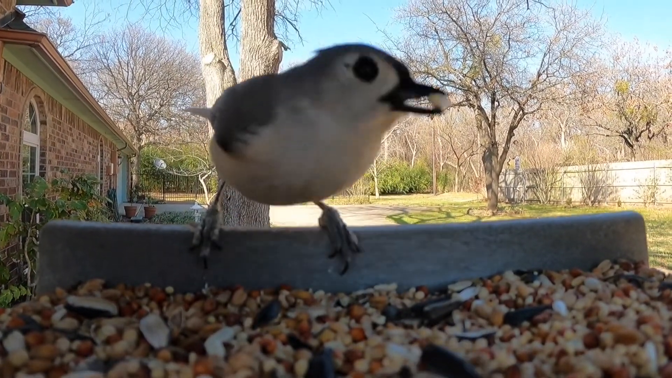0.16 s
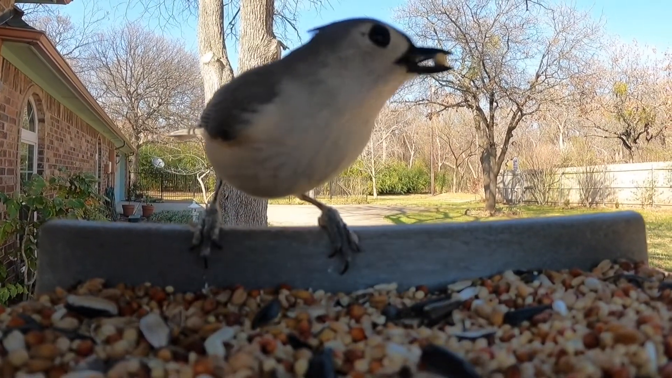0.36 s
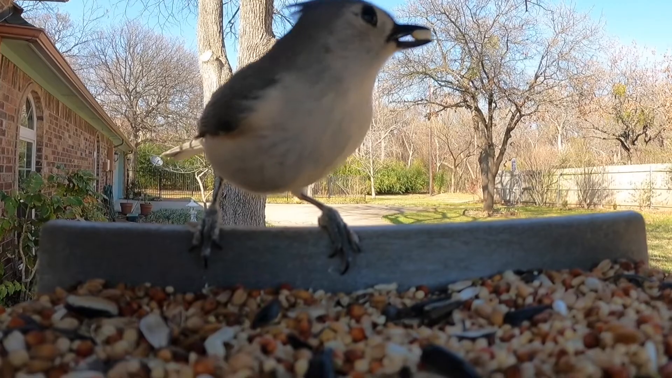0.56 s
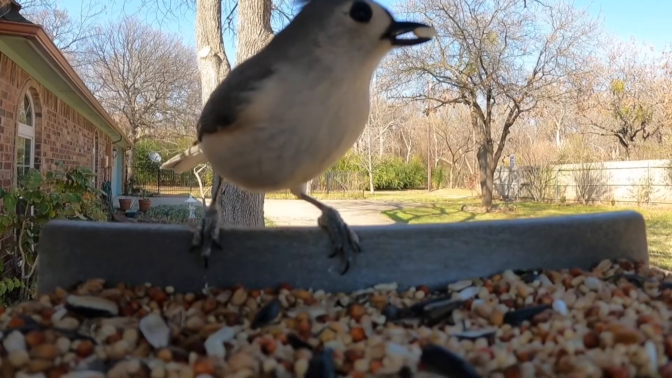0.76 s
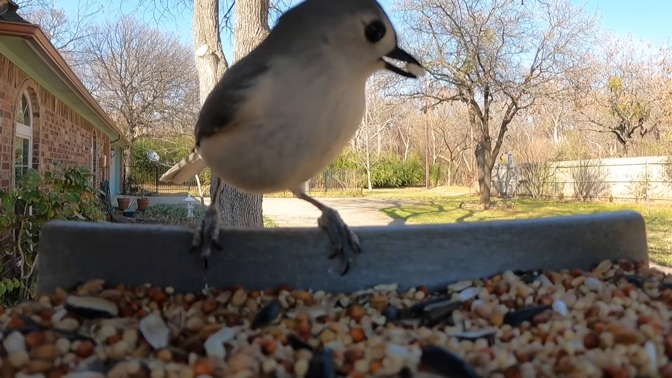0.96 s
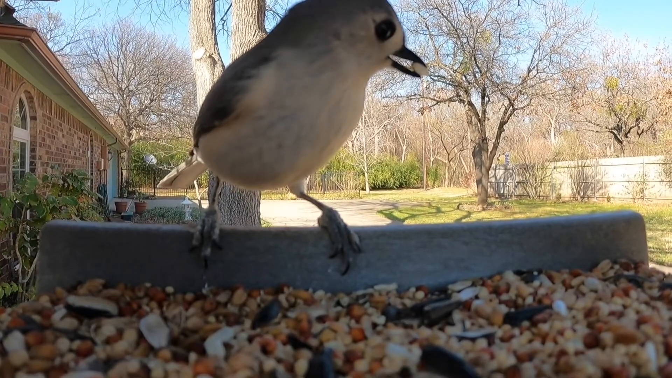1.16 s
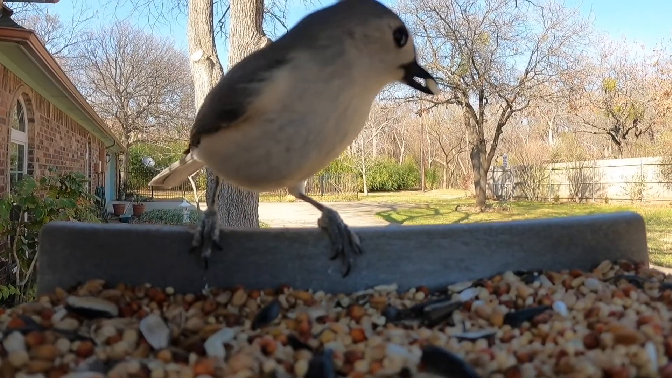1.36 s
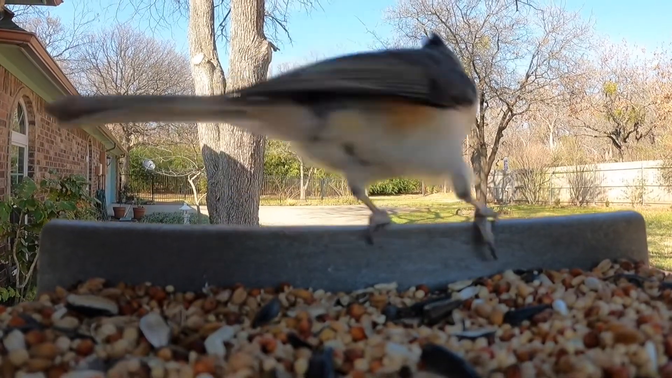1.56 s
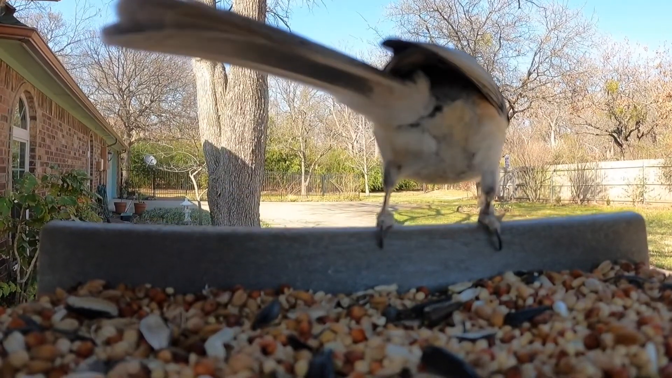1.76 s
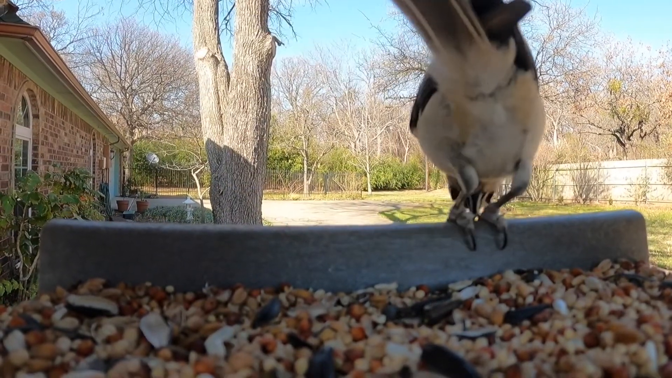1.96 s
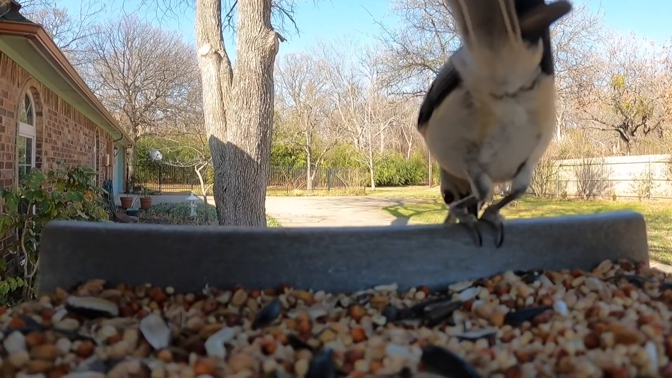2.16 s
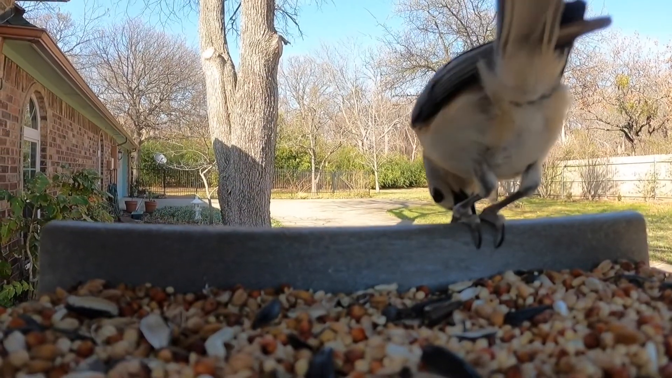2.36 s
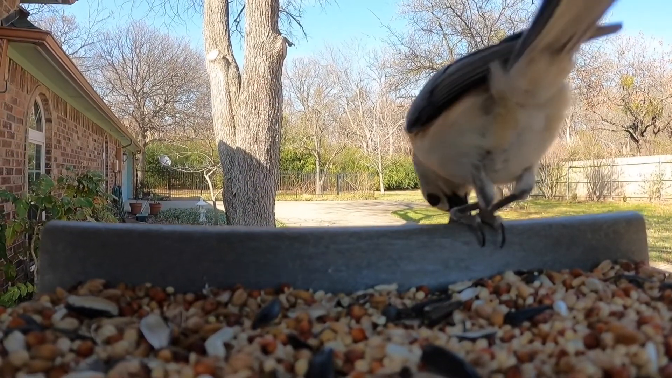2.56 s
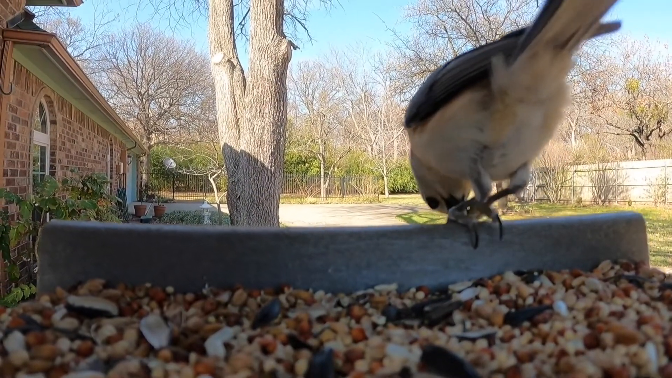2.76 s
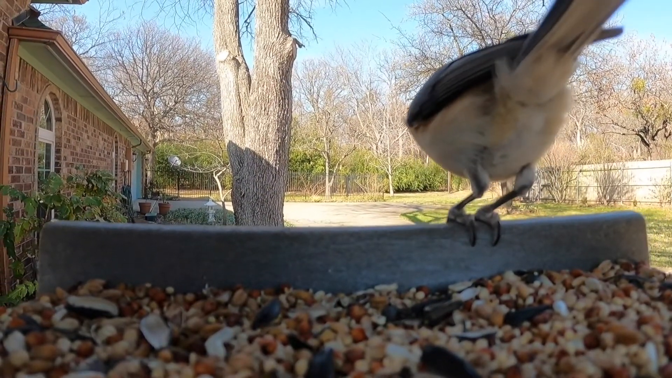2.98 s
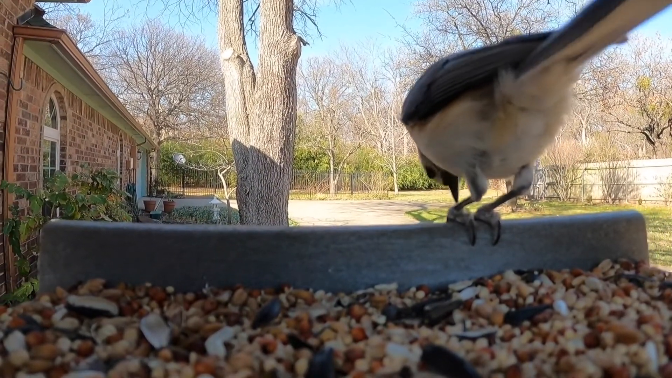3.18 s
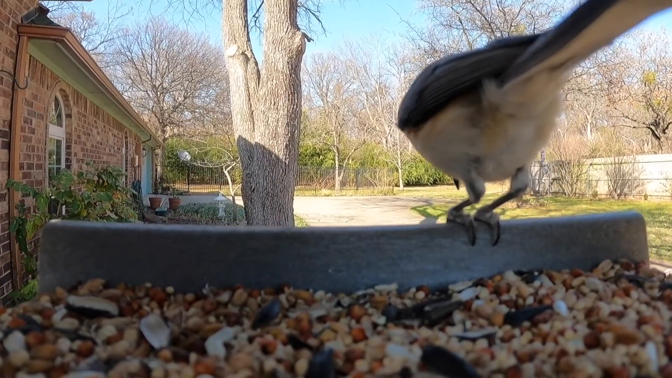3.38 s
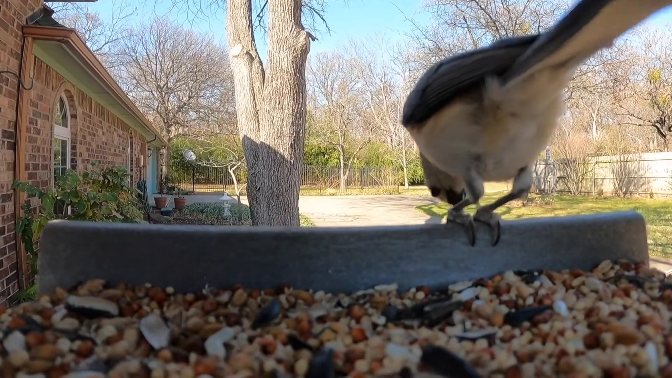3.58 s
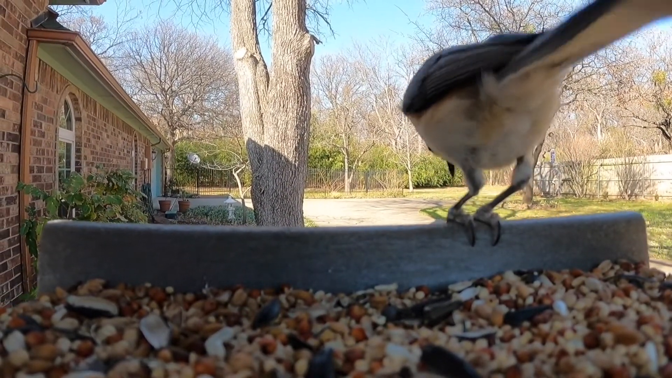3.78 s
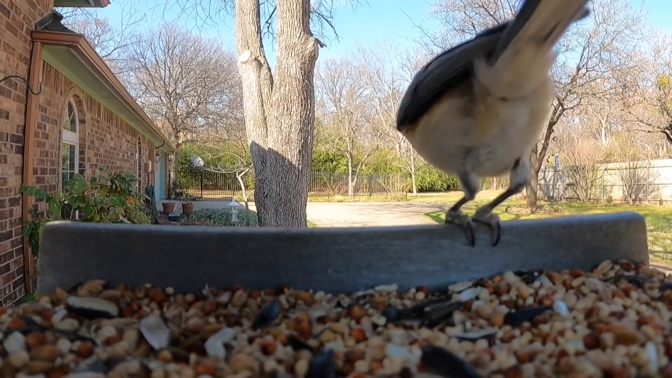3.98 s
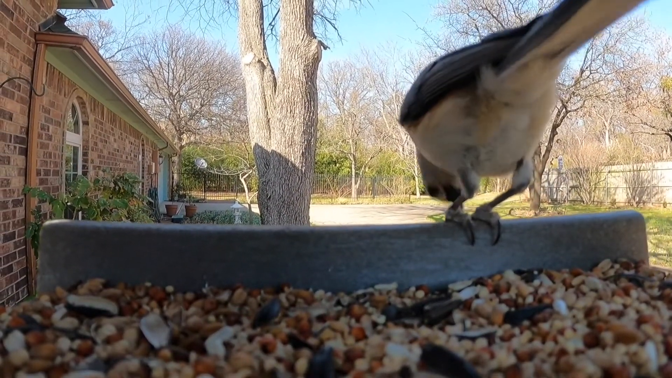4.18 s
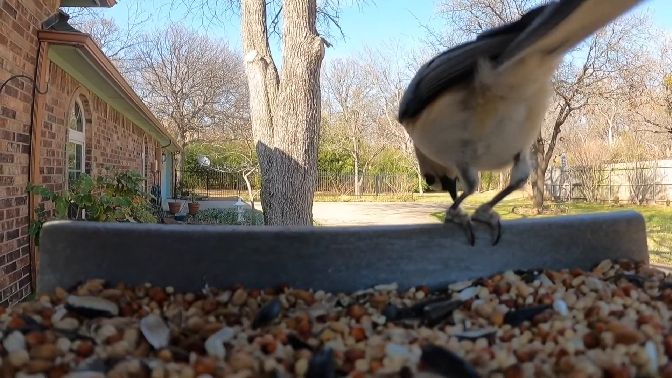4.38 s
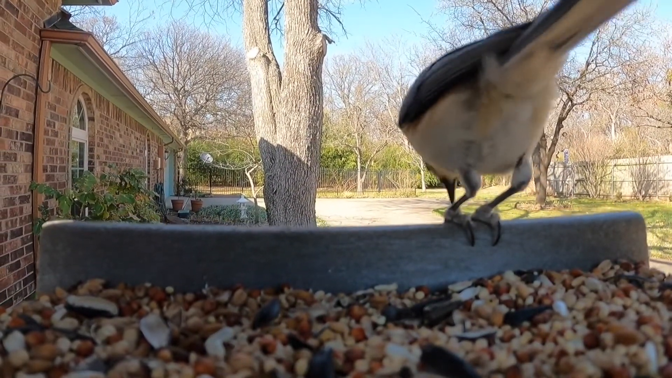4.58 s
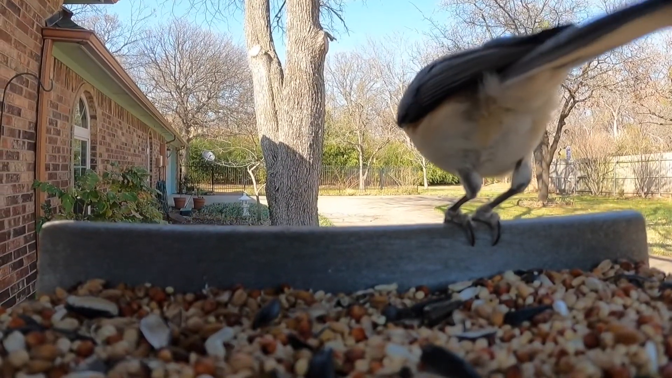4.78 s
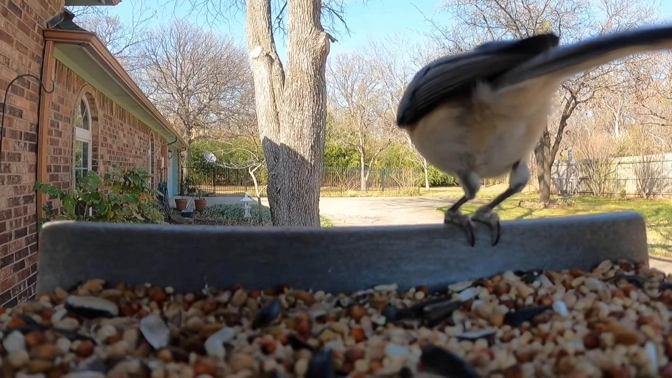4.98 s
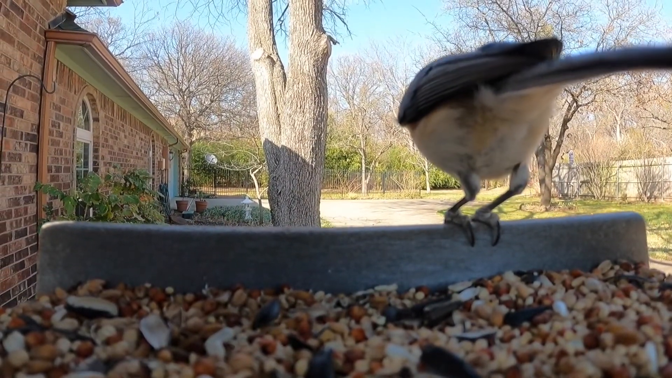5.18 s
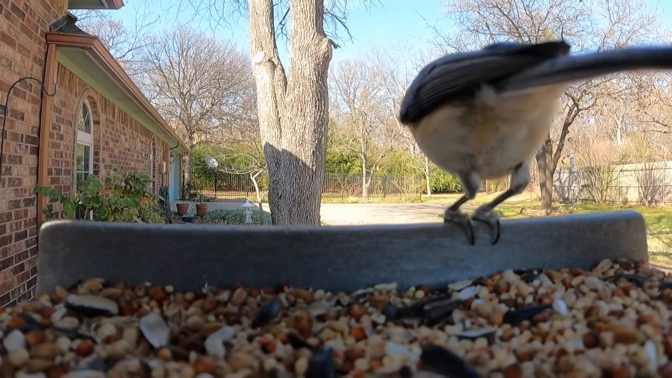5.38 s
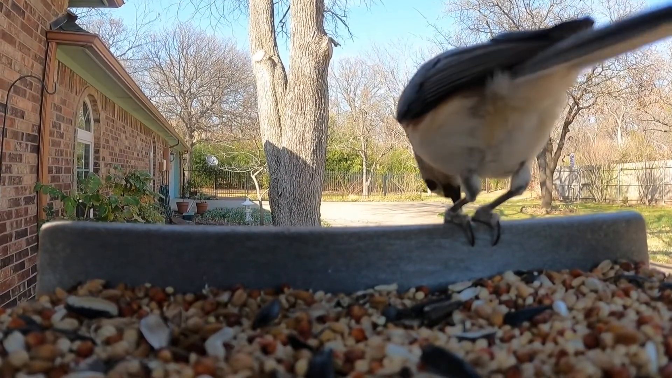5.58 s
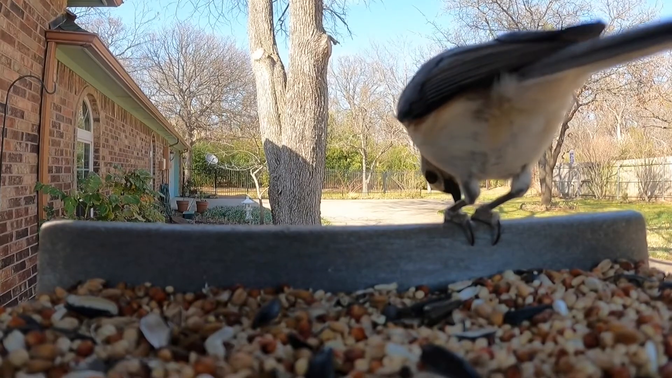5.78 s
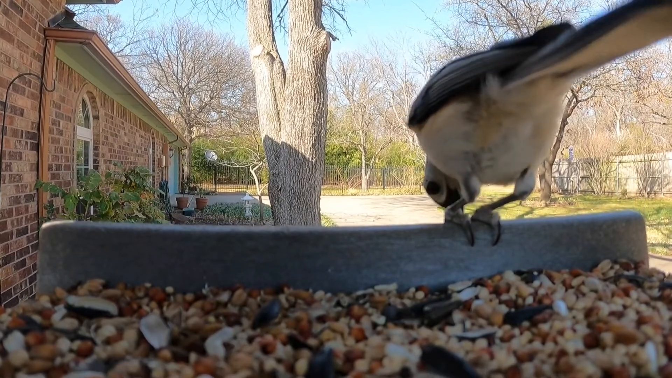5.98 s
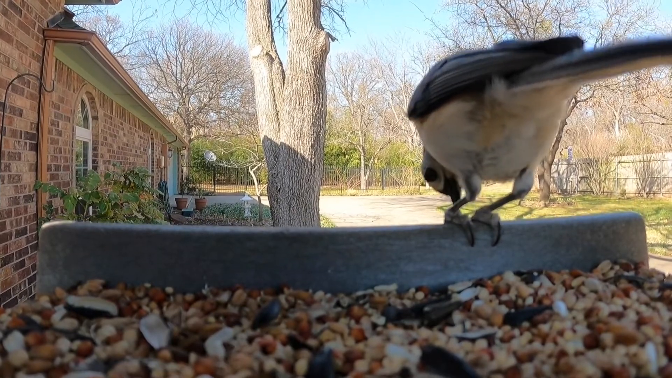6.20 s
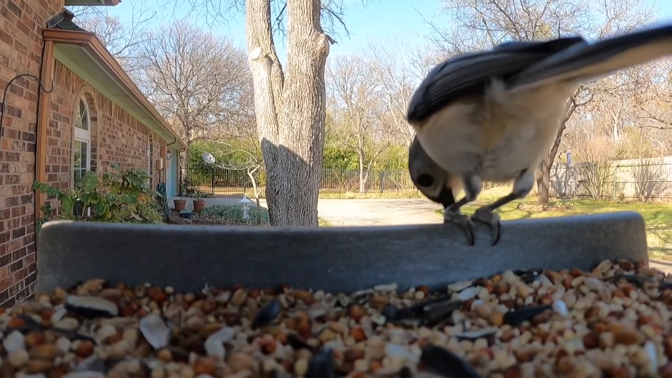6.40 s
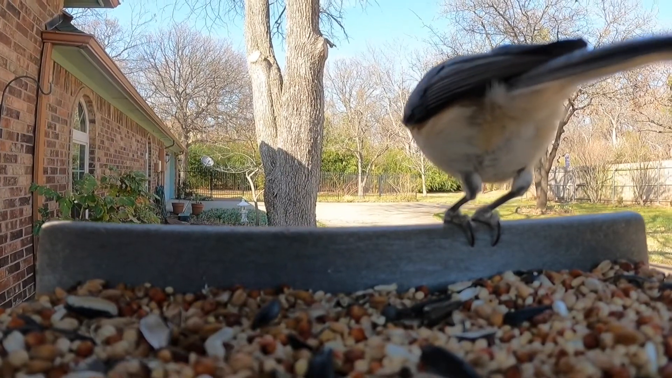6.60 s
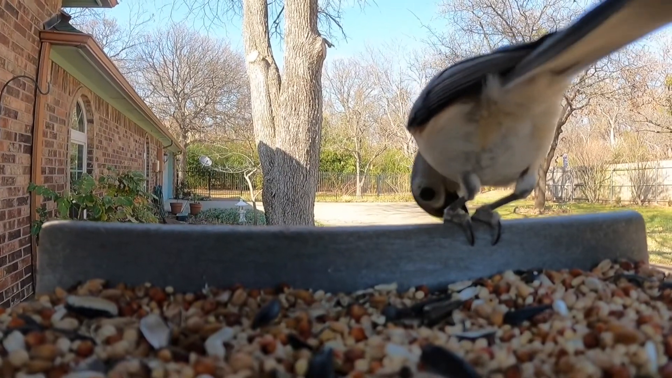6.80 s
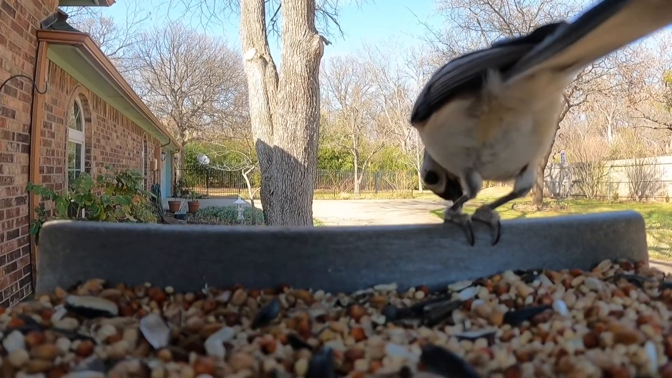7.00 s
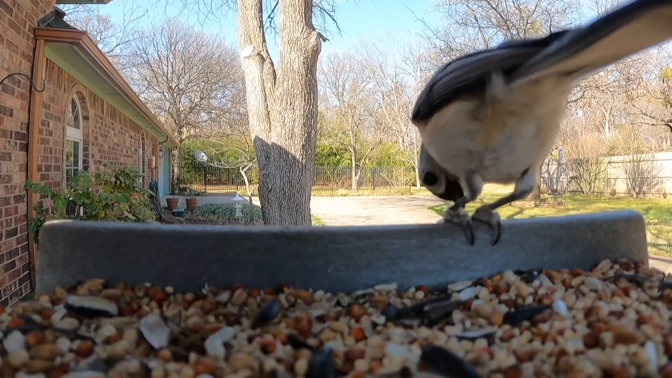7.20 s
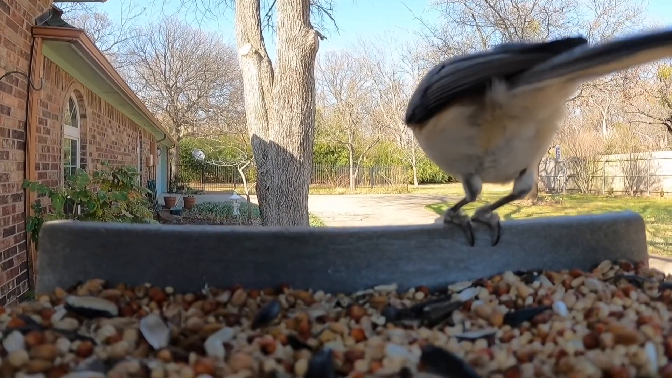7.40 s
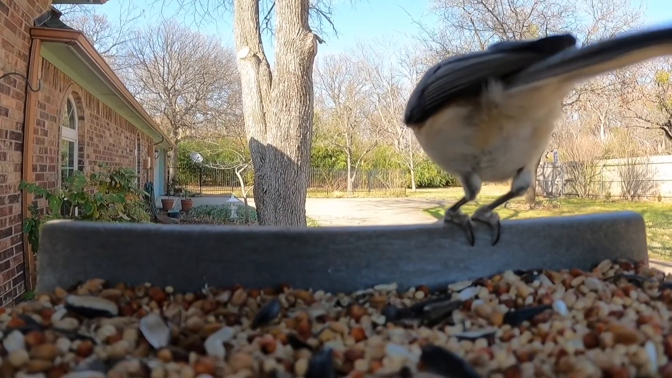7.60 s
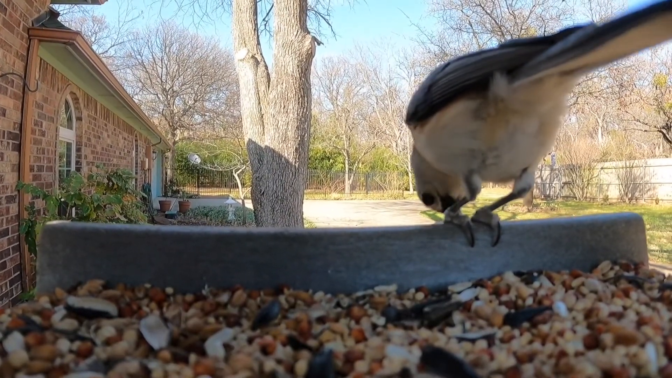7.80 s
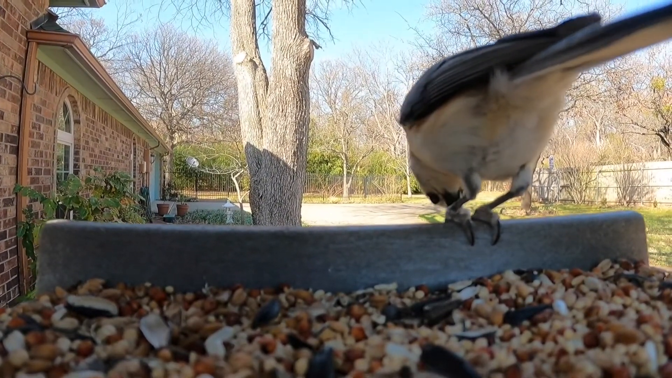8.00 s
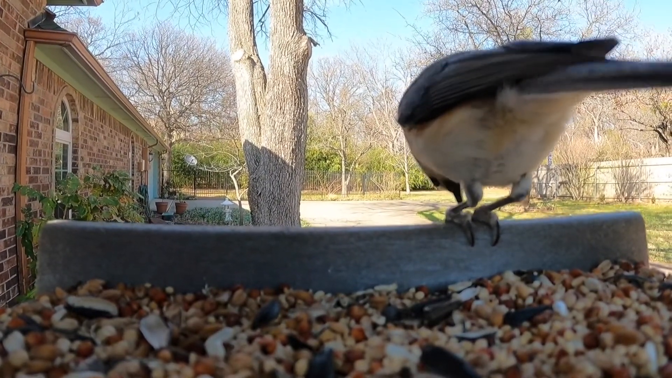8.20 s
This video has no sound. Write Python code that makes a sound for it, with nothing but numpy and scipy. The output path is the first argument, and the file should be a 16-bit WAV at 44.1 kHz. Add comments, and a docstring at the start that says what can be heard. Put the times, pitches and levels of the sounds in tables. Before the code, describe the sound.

A quiet yard with low air rumble and a faint distant wash that rises around 2 s; the feeder is very close. At 0-0.6 s soft foot thuds, a muted crunch and tiny nibbles. A far bird whistles, each note sliding down for about 0.65 s with echo: faint at 0.7, clear at 1.7, 2.7, 3.7 and 4.8. At 1.6 s a crisp seed crunch and sharp knocks; from 1.9 to 3 s a scrabble of claw clicks, loose husk rustle and hard rim knocks, strongest near 2.3 and 2.6. A thin high call flicks by at 1.8. From 3.3 to 4.6 s, separate hollow pecks ring briefly on the rim. Tiny high chips run at 5.1, a peep at 5.5, light knocks at 5.75, faint chatter around 6-7. Dull crunches come at 6.0 and 6.5, heavier with clicks at 6.9 and 7.2, then a feather brush and last crunch at 7.9.

```python
"""Small bird at a seed tray

A small bird feeds on the rim of a plastic seed tray, very close to the listener. Claws, beak, hops and
pecks are short bursts of noise or force that ring husks, rim and tray; crushed seed is many tiny cracks.
Across the yard a larger bird repeats a falling whistle and small birds twitter, made of gliding tones
and narrow noise, with echoes. Shaped noise makes the low air rumble, the wash and the leaf hiss."""
import sys
import numpy as np
from scipy import signal
from scipy.fft import rfft, irfft, next_fast_len
from scipy.io import wavfile

SR = 44100
rng = np.random.default_rng(int(sys.argv[2]) if len(sys.argv) > 2 else 0)


def master_out(mix):
    """Clip the mix to full scale and print it as 16-bit PCM to the path in sys.argv[1]."""
    frames = np.transpose(np.atleast_2d(mix))
    ceiling = np.clip(frames, -1, 1)
    pcm = np.round(ceiling * 32767).astype(np.int16)
    wavfile.write(sys.argv[1], SR, pcm)


N = 363825

# The yard's air, as a tone balance. Each row: frequency in Hz, relative strength in dB per Hz.
AIR_SPECTRUM = [(25, -18), (62, 4.5), (125, 0), (200, -7), (260, -9), (400, -18), (590, -14.5),
                (810, -27.5), (1260, -19), (1650, -29.5), (2500, -27), (4000, -39.5), (9000, -63.5)]
# How the air changes. Each row: time in seconds, distant wash in relative dB, leaf hiss in relative dB.
BREEZE = [(0, -84.5, -96), (1.5, -80.5, -93), (1.999, -69.5, -89.5), (3.5, -70.5, -90.5),
          (5.2, -74.5, -88.5), (8.25, -74, -91.5)]
# Falling whistles. Each row: start in seconds, relative level in dB, length in seconds, pitch factor.
WHISTLES = [(-.31, -78, 0.69, 1.06), (0.68, -68.5, 0.7, 1.022), (1.707, -55.5, 0.64, 1.01),
            (2.716, -55, 0.63, 1.004), (3.745, -58, .68, 1.01), (4.831, -56, 0.61, 0.99)]
# The bird shifts its weight. Each row: start in seconds, level of the first push in dB, count of pushes.
THUDS = [(.013, -49.5, 1), (.256, -49.5, 2), (.402, -52, 2), (.582, -55, 2), (1.435, -56.5, 1),
         (2.524, -43, 3), (3.652, -58, 1)]
# A husky peep on one pitch. Each row: start in seconds, level in dB.
PEEPS = [(0.034, -71.5), (3.449, -72), (5.477, -57.5), (7.54, -84)]
# Small birds chip in even runs. Each row: start in seconds, level in dB, centre in Hz, count of chips.
CHIP_RUNS = [(5.076, -76, 7050, 6), (5.841, -72, 7200, 1), (6.277, -67, 6940, 1)]
# Spells of faint chatter. Each row: start in seconds, length in seconds, loudest chirps in dB.
CHATTER = [(0.867, 0.35, -78), (5.918, 1, -68.5)]
# Beak and feet dig in and seed is crushed. Each row: start in seconds, tray body in dB,
# kernel in relative dB, husk in relative dB, body centre in Hz.
CRUNCHES = [(0.132, -48, -71, -58.5, 530), (1.61, -47.5, -61, -47.5, 580), (1.646, -69, -54.5, -58.5, 550),
            (6.038, -51, -57.5, -64, 310), (6.471, -55, -64.5, -58, 238), (6.9, -36.5, -47, -59, 245),
            (7.176, -40, -46, -51.5, 227), (7.896, -42.5, -52, -63, 190)]
# The beak works a seed in even bites. Each row: start in seconds, first bite in relative dB,
# count of bites.
NIBBLES = [(.2885, -63.5, 1), (.449, -72, 5), (7.0178, -55, 1), (8.1896, -73.5, 1)]
# Sharp dry clicks of claws, beak or cracking seed, singly or in quick runs. Each row: start in seconds,
# first click in relative dB, count of clicks.
CLICK_RUNS = [(1.6161, -42.5, 1), (1.6502, -42, 1), (1.9287, -56, 2), (1.9683, -51.5, 2),
              (2.0851, -56.5, 1), (2.1538, -50.5, 1), (2.21, -51.5, 3), (2.409, -53.5, 2), (2.6753, -53, 2),
              (2.6999, -46.5, 2), (2.9218, -50, 2), (2.9638, -68, 1), (3.2622, -58, 3), (3.7102, -51.5, 1),
              (6.882, -52, 1), (6.897, -48.5, 2), (7.1738, -42, 1)]
# Hops and sharp blows on the rim. Each row: time in seconds, rim in dB, tray body in dB,
# claw click in relative dB.
KNOCKS = [(1.673, -38, -36.5, -46), (1.686, -44.5, -59, -41.5), (2.011, -59, -49.5, -47),
          (2.127, -45, -43.5, -51), (2.2791, -30.5, -47.5, -47), (2.2984, -33, -44, -45),
          (2.38, -45.5, -44, -49.5), (2.632, -30.5, -44.5, -44.5), (2.828, -40, -46, -46.5),
          (2.888, -54, -52, -47.5), (4.435, -43, -61.5, -77), (5.726, -58, -52, -58.5),
          (5.746, -53, -54.5, -46.5), (5.785, -82, -52.5, -57)]
# Hammering on a seed held against the rim. Each row: time in seconds, rim in dB, tray body in dB,
# husk in relative dB.
PECKS = [(3.326, -45, -42.5, -71.5), (3.692, -47.5, -42, -73.5), (3.815, -41.5, -42, -76),
         (3.968, -42, -51, -62.5), (4.3, -46, -44.5, -79), (4.445, -42.5, -48, -74.5),
         (4.601, -41.5, -48.5, -67)]
# Free ringing after a peck. Each row: frequency in Hz, relative level in dB,
# time to fall by 60 dB in seconds (the pecks also cut the ring short).
RING = [(878, -24, 0.034), (1256, 9, 0.16), (1544, -5.5, 0.13), (1980, -23, 0.049), (2080, -11.5, 0.34),
        (2620, -20.5, 0.09)]
# Feathers brush as the bird bends down to the seed. Each row: time in seconds, peak level in dB.
RUFFLES = [(7.17, -72.5), (7.887, -65.5)]

# Resonances of a dry husk. Each row: frequency in Hz, width in Hz, strength in dB.
HUSK = [(2380, 480, 9.5), (3380, 460, 6), (4224, 550, -2), (5006, 247, 6), (6700, 770, 4.5)]
# Resonances of the stiff rim. Each row: frequency in Hz, width in Hz, strength in dB.
RIM = [(850, 110, -24), (1100, 85, -31), (1272, 53, 13.5), (1535, 180, 5), (1856, 110, 2), (2193, 83, 2.5),
       (2520, 260, -32)]
# Resonances of the tray below the rim. Each row: frequency in Hz, width in Hz, strength in dB.
BODY = [(138.3, 42, -3.5), (241.5, 33.3, 4), (341.4, 86, -8), (392.6, 106, -11), (565.6, 81, 1)]
# Slow bending of the tray under the feet. Each row: frequency in Hz, width in Hz, strength in dB.
FLEX = [(62, 34, 5), (101, 63, 13.5), (148.5, 20, 12.5), (240, 50, -17)]

T = np.arange(8192) / SR  # seconds within one event
NOW = np.arange(N) / SR  # seconds within the scene
EDGE_HZ = 15500  # upper limit of the whole sound

# A whistle scoops up, holds its top, then sinks towards a low pitch. Times are shares of its length.
# The pitches are those of the fundamental, before each whistle's own pitch factor.
TOP_HZ, LOW_HZ, HOLD, SINK = 1263, 985, 0.16, .42
SCOOP_HZ, SCOOP = 294, 0.0119
BREAK, BREAK_WIDTH, BREAK_HZ, BREAK_DB = .49, 0.049, 89.7, 1.5  # midway it steps down, grows firmer
DROOP_HZ, DROOP = 90, .1  # it sags as it dies
SWELL, START_DB, RELEASE, END_DB = 0.14, -7, 0.53, -25  # its effort

PUSH_GAP_S, PUSH_FADE_DB = .039, -3.5  # from one push to the next
PEEP_HZ, PEEP_S, PEEP_ROUGH_DB = 5270, 0.039, -24
CHIP_GAP_S = .068
# Chatter picks each pitch from CHATTER_HZ upwards, within CHATTER_OCTAVES.
CHATTER_PER_S, CHATTER_SPREAD_DB, CHATTER_HZ, CHATTER_OCTAVES = 52, 15.5, 6070, .5
CHIRP_S, CHIRP_GLIDE, CHIRP_ROUGH_DB = 0.019, 0.084, -24  # the widest glide is a share of the pitch
# One thin call rises to a held pitch and is cut off.
TSEET_S, TSEET_RISE_S, TSEET_FADE_S = 1.827, 0.029, 0.0098
TSEET_FROM_HZ, TSEET_TO_HZ, TSEET_DB = 5940, 7440, -58
SETTLE_S, SETTLE_DB = .054, -20  # the crushed seed gives once more
BITE_GAP_S, BITE_GAIN_DB, BITE_HZ = .0645, 2, 7100  # each bite is a little firmer
CLICK_GAP_S, CLICK_FADE_DB = .0125, -3.5  # from one click to the next
CLICK_HZ, CLICK_DB_PER_OCTAVE = 4570, 75  # centre of a click listed at -52.5 dB; lighter ones are thinner
BOOM_HZ, BOOM_DB_PER_OCTAVE = 363, 32  # tray boom at -48 dB; harder blows reach higher modes
RUFFLE_S = 0.05


def amp(db):
    """Turns decibels into gain."""
    return 10 ** (np.asarray(db) / 20)


def level(x, db, span=None):
    """Scales a sound to an average (rms) level over its first span seconds, or over all of it."""
    opening = x[..., :span and round(span * SR)]
    return x * amp(db) / np.sqrt(np.mean(opening ** 2) + 1e-24)


def add(mix, s, sound):
    """Mixes a sound in at time s; what falls outside the scene is dropped."""
    at = round(s * SR)
    sound = sound[..., max(-at, 0):]
    part = mix[:, max(at, 0):][:, :sound.shape[-1]]
    part += sound[..., :part.shape[1]]


def band(x, lo_hz, hi_hz, order=3):
    """Keeps one band of pitches, with a filter that never rings ahead of the sound."""
    size = next_fast_len(x.shape[-1] + 1024)
    s = 1j * (np.fft.rfftfreq(size, 1 / SR) + 1e-6)
    u = (s * s + lo_hz * hi_hz) / (s * (hi_hz - lo_hz))
    slope = np.polyval(np.poly(signal.buttap(order)[1]).real, u)
    return irfft(rfft(x, size) / slope, size)[..., :x.shape[-1]]


def pair(size, apart):
    """Makes left and right noise; apart is the part that they do not share."""
    mid, side = rng.standard_normal((2, size))
    return np.array([mid + apart * side, mid - apart * side])


def pan(x, db):
    """Leans a sound to the left by db; a negative db leans it to the right."""
    return x * amp([[db / 2], [-db / 2]])


def contact(decay, tail_db, tail, apart):
    """A touch is a snap of tiny slips with a weaker, longer rattle; decay and tail in seconds."""
    return pair(len(T), apart) * (np.exp(-T / decay) + amp(tail_db) * np.exp(-T / tail))


def resonate(x, modes):
    """An object answers a force most strongly at its own resonances."""
    s = 1j * np.fft.rfftfreq(len(T), 1 / SR)
    gain = sum(amp(db) * s * width / (s * s + s * width + hz * hz) for hz, width, db in modes)
    return irfft(rfft(x) * gain)


def tray(force, hz):
    """The tray booms around a given centre pitch, and the left side is shaded."""
    boom = band(resonate(force, BODY), hz * 0.74, hz * 1.41, order=1)
    return pan(band(boom, 77, 587), db=-4.5)


def outdoors(x, t60, delay):
    """Trees and walls scatter echoes, different left and right, that fall by 60 dB in t60 seconds."""
    t = np.arange(SR) / SR
    chosen = rng.random((2, SR)) < 2000 / SR  # about 2000 echoes a second
    taps = rng.standard_normal((2, SR)) * chosen * amp(-60 * t / t60) * (t > delay)
    return signal.fftconvolve(x, taps / np.linalg.norm(taps[0]), axes=1)[:, :N]


def train(rows, gap, step_db):
    """Unfolds rows of (s, dB, count) into even repeats (s, dB) that change by step_db each."""
    return [(s + k * gap, db + k * step_db) for s, db, count in rows for k in range(round(count))]


def sharp_clicks():
    """Lists the sharp clicks (s, dB): the dry runs, and the claw click of every blow."""
    runs = train(CLICK_RUNS, CLICK_GAP_S, CLICK_FADE_DB)
    return runs + [(s, claw_db) for s, _, _, claw_db in KNOCKS]


def yard():
    """Air noise splits into a lumpy low rumble and a distant wash; leaves add a faint hiss."""
    hz = np.fft.rfftfreq(N, 1 / SR)
    f, db = np.transpose(AIR_SPECTRUM)
    s, wash_db, leaf_db = np.transpose(BREEZE)
    air = rfft(pair(N, 0.39)) * amp(np.interp(np.log(hz + 1), np.log(f), db))
    low = 1 / (1 + (hz / 300) ** 4)
    gust = level(band(rng.standard_normal(N), 0.86, 1.8, order=1), 0)  # slow random swell
    swell_db = np.interp(NOW, s, wash_db)
    rumble_swell_db = 3.4 * gust + 0.67 * (swell_db - swell_db.mean())
    rumble = level(irfft(air * low, N), -68.0) * amp(rumble_swell_db)
    wash = level(irfft(air * (1 - low), N), -2.03) * amp(swell_db + gust)
    leaves = level(band(pair(N, 0.77), 2300, 6500, order=3), -5.0) * amp(np.interp(NOW, s, leaf_db))
    hiss = level(pair(N, 0.92), -103)
    return pan(rumble, db=1.0) + wash + leaves + hiss


def whistler():
    """A far call is led by its second harmonic; echoes smear it above the falling pitch."""
    out = np.zeros((2, N))
    for s, db, length, pitch in WHISTLES:
        u = np.arange(0, 1, 1 / (length * SR))  # share of the note gone by
        sink = np.exp(-np.maximum(u - HOLD, 0) / SINK)
        hz = LOW_HZ + (TOP_HZ - LOW_HZ) * sink - SCOOP_HZ * np.exp(-u / SCOOP)
        broken = .5 + .5 * np.tanh((u - BREAK) / BREAK_WIDTH)
        hz = hz - BREAK_HZ * broken - DROOP_HZ * np.exp((u - 1) / DROOP)
        start_db = START_DB * np.maximum(1 - u / SWELL, 0)
        end_db = END_DB * (np.maximum(u - RELEASE, 0) / (1 - RELEASE)) ** 2
        effort_db = BREAK_DB * (broken - 1) + start_db + end_db
        waver = level(band(rng.standard_normal(len(u)), 27, 140, order=1), -40.5)
        phase = 2 * np.pi * np.cumsum(hz * pitch * (1 + waver)) / SR
        voice = np.sin(2 * phase) + amp(-26.5) * np.sin(phase)
        voice += amp(-25) * np.sin(np.pi * u) ** 2 * np.sin(3 * phase) + amp(-35.0) * np.sin(4 * phase)
        # the fundamental shows as the note starts
        opening = amp(-10.5) * np.exp(-(u / 0.093) ** 4) * np.sin(phase)
        note = amp(effort_db) * voice + opening
        add(out, s, amp(db) * note * signal.windows.tukey(len(u), .05))
    return amp(-3.5) * out + amp(4.0) * outdoors(out, t60=0.96, delay=0.017)


def thuds():
    """Soft pushes of the feet flex the tray at its low resonances."""
    out = np.zeros((2, N))
    for s, db in train(THUDS, PUSH_GAP_S, PUSH_FADE_DB):
        push = resonate(contact(decay=0.003, tail_db=-4.0, tail=0.019, apart=0.87), FLEX)
        add(out, s, level(band(push, 38, 312), db, span=0.049))
    return out


def chirp(length, hz, glide, rough_db):
    """A short thin note swells and fades while its pitch glides and flutters."""
    u = np.linspace(-.5, .5, round(length * SR))
    flutter = level(band(rng.standard_normal(len(T)), 100, 810, order=1), rough_db)[:len(u)]
    phase = 2 * np.pi * np.cumsum(hz * (1 + glide * u + flutter)) / SR
    return np.cos(np.pi * u) ** 2 * np.sin(phase)


def twitter():
    """Small birds make noisy chips, peeps, faint chatter and one rising call, with the yard's echo."""
    out = np.zeros((2, N))
    for s, db, hz, count in CHIP_RUNS:
        for k in range(round(count)):
            chip = band(pair(len(T), 0.71), hz * 0.84, hz * 1.1) * T * np.exp(-T / 0.0035)
            add(out, s + k * CHIP_GAP_S, level(chip, db, span=0.033))
    for s, db in PEEPS:
        add(out, s, amp(db) * chirp(PEEP_S, PEEP_HZ, 0, PEEP_ROUGH_DB))
    for s, length, db in CHATTER:
        # each chirp draws its own time, pitch, softness and glide
        for when, high, soft, bend in rng.random((64, 4))[:round(length * CHATTER_PER_S)]:
            hz = CHATTER_HZ * 2 ** (CHATTER_OCTAVES * high)
            note = chirp(CHIRP_S, hz, CHIRP_GLIDE * (2 * bend - 1), CHIRP_ROUGH_DB)
            add(out, s + length * when, amp(db - CHATTER_SPREAD_DB * soft) * note)
    flutter = level(band(rng.standard_normal(len(T)), 100, 900, order=1), -35)
    hz = np.interp(T, [0, TSEET_RISE_S], [TSEET_FROM_HZ, TSEET_TO_HZ]) * (1 + flutter)
    swell = np.minimum(T / .004, 1) * np.exp(-np.maximum(T - TSEET_RISE_S, 0) / TSEET_FADE_S)
    add(out, TSEET_S, amp(TSEET_DB) * swell * np.sin(2 * np.pi * np.cumsum(hz) / SR))
    return out + amp(-4.5) * outdoors(out, t60=0.17, delay=0.0076)


def crunches(rise=0.0077, fall=0.0066):
    """A clump of tiny fractures swells and dies, then settles; the tray booms under it."""
    out = np.zeros((2, N))
    age = T - .03  # seconds from the peak of the strain
    strain = np.exp(np.minimum(age / rise, -age / fall))
    strain += amp(-21.5) * np.exp(np.minimum(age / 0.0027, -age / 0.049))
    for start, body_db, kernel_db, husk_db, hz in CRUNCHES:
        for s, gain in (start, 1), (start + SETTLE_S, amp(SETTLE_DB)):
            # cracks come at random, about 3500 a second, with random sizes
            sizes = rng.exponential(1, len(T)) * (rng.random(len(T)) < 3500 / SR)
            cracks = pair(len(T), 0.54) * strain * sizes
            kernel = band(cracks, 1074, 2380)
            add(out, s - .028, gain * level(kernel, kernel_db - 5.0, span=0.072))
            husk = band(resonate(cracks, HUSK), 2800, 6900, order=4)
            add(out, s - .028, gain * level(husk, husk_db - 5.0, span=0.032))
            force = contact(decay=0.014, tail_db=-4.5, tail=0.025, apart=0.13)
            force = force * (1 - np.exp(-T / 0.0014))  # soft start
            add(out, s - .006, gain * level(tray(force, hz), body_db, span=0.026))
    return out


def ticks(skid=0.0049, skid_db=-13, width=1.294):
    """Each sharp click or bite skids, then snaps, and rings husks around its own pitch."""
    out = np.zeros((2, N))
    age = T - .01  # seconds from the snap
    grip = amp(skid_db) * np.exp(np.minimum(age, 0) / skid) * (age < 0)
    snap = (np.exp(-abs(age) / 0.0012) + amp(-21.0) * np.exp(-abs(age) / 0.011)) * (age >= 0)
    clicks = [(s, db, CLICK_HZ * 2 ** (-(db + 52.5) / CLICK_DB_PER_OCTAVE)) for s, db in sharp_clicks()]
    bites = [(s, db, BITE_HZ) for s, db in train(NIBBLES, BITE_GAP_S, BITE_GAIN_DB)]
    for s, db, hz in clicks + bites:
        click = resonate(pair(len(T), 0.48) * (grip + snap), HUSK)
        focused = band(click, hz / width, hz * width, order=1)
        click = band(focused, 1600, 7660, order=6) + amp(-42) * click
        add(out, s - .01, level(click, db - 4.5, span=0.016))
    return out


def loose_seed(rustle_db=-69, per_s=150):
    """Husks slip at random around the firmer sharp clicks, each slip a grain that rings and fades."""
    t = NOW[::64]  # a coarse clock is enough for the activity
    busy = sum(amp(.7 * (db + 50)) * np.exp(-((t - s - .012) / .018) ** 2)
               for s, db in sharp_clicks() if db > -58)
    slips = (rng.random(N) < per_s / SR) * rng.exponential(1, N)
    slips = slips * np.interp(NOW, t, np.minimum(busy, 1))
    fading = signal.lfilter([1], [1, -np.exp(-1 / (0.0017 * SR))], slips + 1e-9)
    grains = pair(N, 0.41) * fading
    ring = resonate(signal.unit_impulse(len(T)), HUSK + BODY[3:] + RIM[2:4])  # they also stir the tray
    rustle = signal.oaconvolve(grains, ring[None], axes=1)[:, :N]
    return level(band(rustle, 300, 5400, order=4), rustle_db)


def knocks():
    """A blow rings the stiff rim briefly and shakes the tray below it."""
    out = np.zeros((2, N))
    for s, rim_db, body_db, _ in KNOCKS:
        rim = resonate(contact(decay=0.00098, tail_db=-7.5, tail=0.0067, apart=0.38), RIM)
        add(out, s, level(band(rim, 840, 3050), rim_db, span=0.0067))
        hz = BOOM_HZ * 2 ** ((body_db + 48) / BOOM_DB_PER_OCTAVE)
        force = contact(decay=0.0041, tail_db=-13.0, tail=0.035, apart=0.57)
        add(out, s, level(tray(force, hz), body_db, span=0.033))
    return out


def pecks(swell=0.0096, hold=0.032, body_delay=0.012, lead=0.0075):
    """The beak meets the seed, the rim sings for some 30 ms, then the whole tray wobbles."""
    out = np.zeros((2, N))
    touch_modes = [(940, 280, 8), (1240, 250, -5), (2000, 130, -20.0), (4030, 840, -19)]
    for s, rim_db, body_db, husk_db in PECKS:
        touch = resonate(pair(len(T), 0.46) * T * np.exp(-T / 0.0031), touch_modes)
        add(out, s - lead - .002, level(band(touch, 710, 4500), rim_db - 11.5, span=.012))
        # each tone of the rim is slightly off pitch and starts at a random point of its wave
        ring = sum(amp(db - 60 * T / t60)
                   * np.sin(2 * np.pi * (hz * rng.normal(1, 0.0044) * T + rng.random()))
                   for hz, db, t60 in RING)
        ring = ring * (1 - np.exp(-T / swell)) / (1 + (T / hold) ** 4)
        ring = level(ring, 0, span=0.039)
        rattle = band(contact(decay=0.01, tail_db=-12.5, tail=0.062, apart=0.55), 240, 2160, order=3)
        rattle = level(rattle, -5.0, span=0.043)
        add(out, s, level(ring + rattle, rim_db, span=0.017))
        push = pair(len(T), 0.25) * T * np.exp(-T / 0.018)
        wobble = band(band(resonate(push, BODY), 136, 227, order=1), 53, 640)
        add(out, s + body_delay, level(wobble, body_db, span=0.041))
        husk = resonate(contact(decay=0.038, tail_db=-14, tail=0.026, apart=.6), HUSK)
        add(out, s, level(band(husk, 1800, 6240), husk_db + 8, span=0.027))
        # the husk squeaks as the beak goes in
        squeak = band(pair(len(T), 0.21), 7700, 7750, order=2) * np.exp(-((T - .013) / 0.008) ** 2)
        add(out, s - .018, level(squeak, husk_db - 3.0, span=0.012))
    return out


def feathers():
    """Feathers brush softly, as noise that swells and fades around a bend of the body."""
    brush = sum(amp(db) * np.exp(-abs(NOW - s) / RUFFLE_S) for s, db in RUFFLES)
    return brush * level(band(pair(N, 0.71), 1200, 2750, order=2), 0)


def scene():
    """The feeder sounds close by with a faint echo, and the yard lies behind it."""
    feeder = thuds() + crunches() + ticks() + loose_seed() + knocks() + pecks() + feathers()
    echo = amp(-20.5) * outdoors(feeder, t60=0.16, delay=0.032)
    return yard() + whistler() + twitter() + feeder + echo


def record(dry):
    """Removes the very highest pitches, above EDGE_HZ."""
    lowpass = signal.firwin(255, EDGE_HZ, window=("kaiser", 9), fs=SR)
    return signal.oaconvolve(dry, lowpass[None], "same")


dry = scene()
out = record(dry)
master_out(out)
```